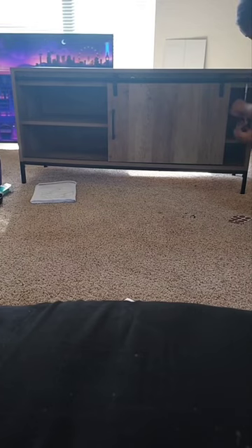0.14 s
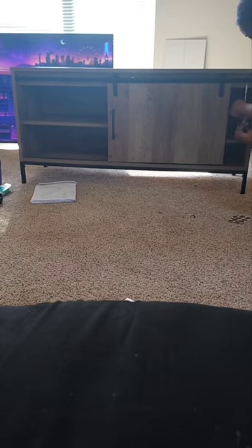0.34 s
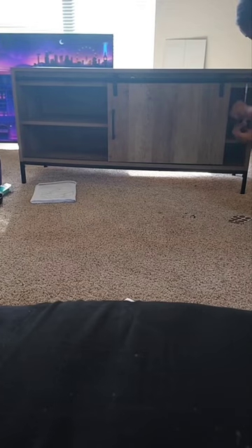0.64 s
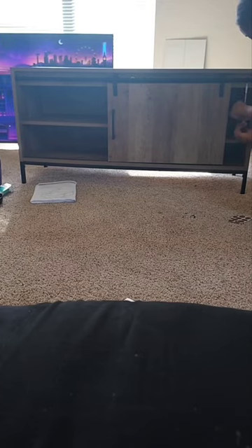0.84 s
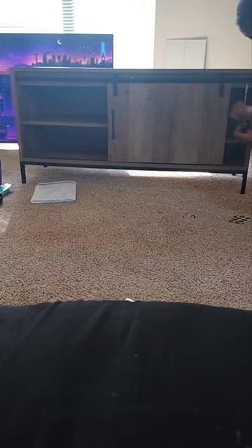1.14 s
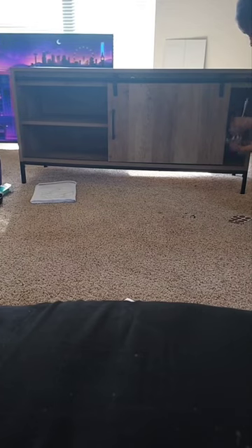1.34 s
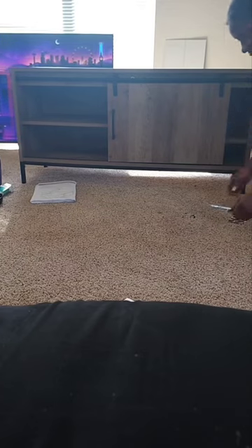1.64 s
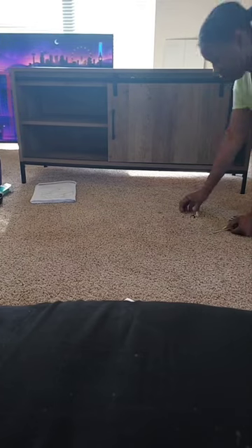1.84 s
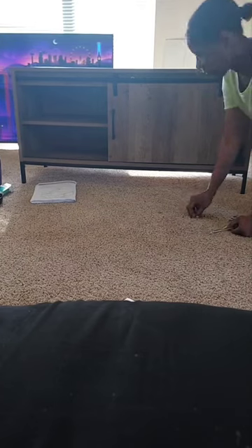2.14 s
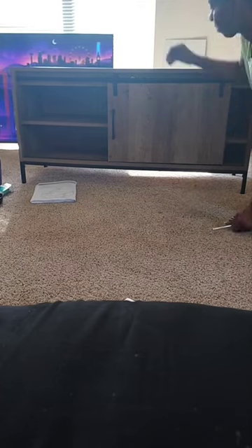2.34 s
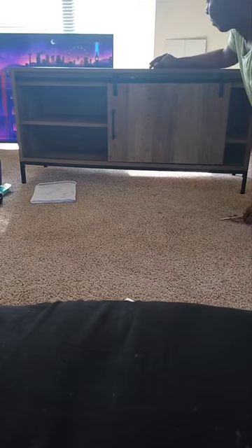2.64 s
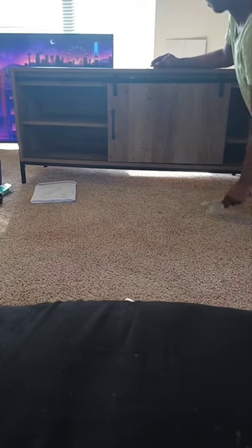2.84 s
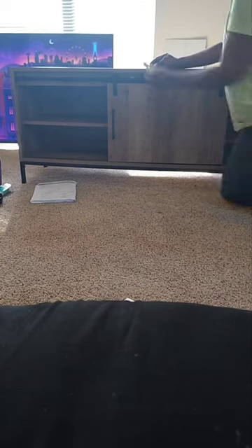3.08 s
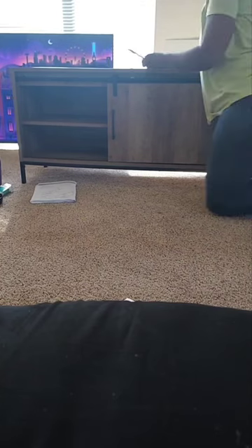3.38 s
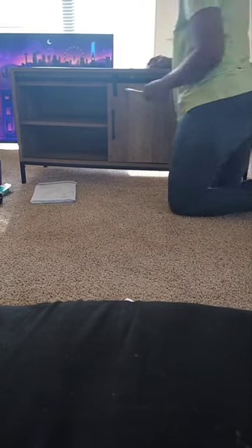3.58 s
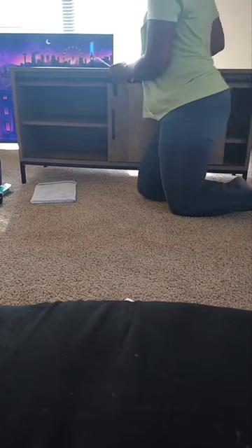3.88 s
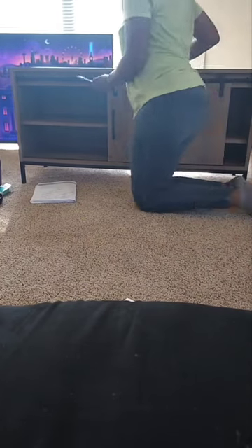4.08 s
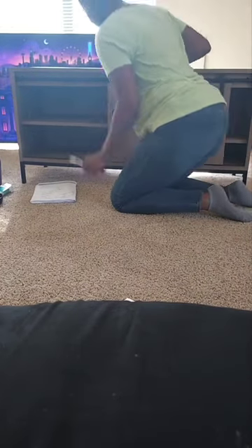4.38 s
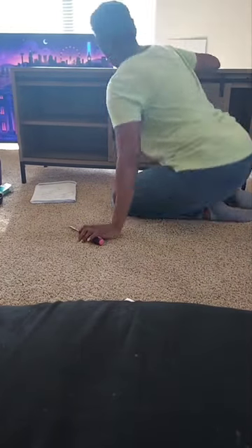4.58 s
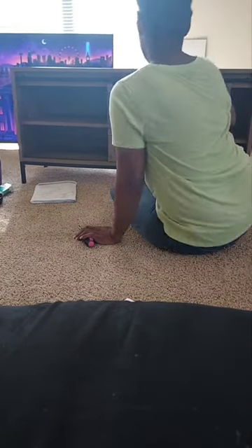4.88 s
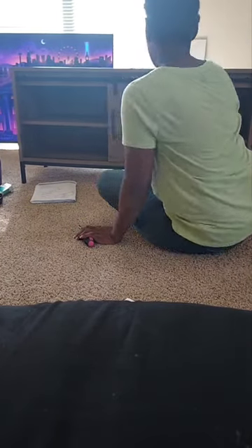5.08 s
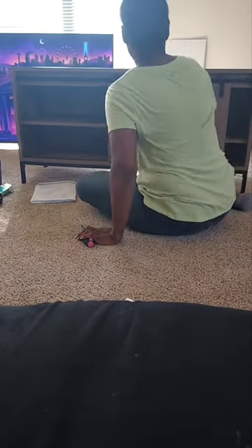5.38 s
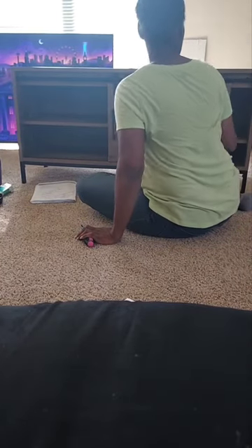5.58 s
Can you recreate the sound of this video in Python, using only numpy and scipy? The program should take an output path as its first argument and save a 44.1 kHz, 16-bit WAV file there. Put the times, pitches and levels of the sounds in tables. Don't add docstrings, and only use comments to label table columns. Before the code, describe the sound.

In a carpeted living room, a steady low hum with airy duct rumble dominates. Soft, dull knocks of tool and fittings come sparsely, with tiny metal ticks from 1.7 seconds. Near 2.8 seconds the cabinet is nudged and screws patter on its top. Slides and clothing rustle follow, then more shoves after 5 seconds. A stereo phone listens from a few steps away.

```python
import sys
import numpy as np
from scipy import signal
from scipy.fft import rfft, irfft, next_fast_len
from scipy.io import wavfile
from scipy.ndimage import uniform_filter1d, map_coordinates

SR = 44100
rng = np.random.default_rng(int(sys.argv[2]) if len(sys.argv) > 2 else 0)


def undo_db(level):
    steps = np.asarray(level, float) / 20
    return 10 ** steps


def wrap_up_sound(samples):
    columns = np.atleast_2d(samples).T
    tamed = np.clip(columns, -1, 1)
    steps = np.round(tamed * 32767).astype(np.int16)
    wavfile.write(sys.argv[1], SR, steps)


N = 252252

# [t/s, peak level/dB, sheen level/dB, upper ring level/dB]
KNOCKS = [(0.225, -57, -23, -0.5), (.287, -50, -14.5, 2), (.55, -64.5, -23.5, -5.5),
          (.697, -49.5, -22.5, -1), (1.025, -64.5, -18, 4.5), (1.162, -54, -17.5, -5),
          (1.248, -59.5, -17.5, 1), (1.344, -64, -12.5, -3), (1.664, -61.5, -24, -1), (1.712, -58, -6, -2),
          (1.762, -48, -12, -6), (2.297, -54.5, -16.5, -6.5), (2.509, -67, -11, -10),
          (3.345, -59, -21.5, -3.5), (3.495, -63.5, -13, -14.5), (3.882, -58, -24.5, 1),
          (3.99, -59, -16, -5.5), (4.462, -61, -14.5, 0)]
KNOCK_S, KNOCK_PANEL_DB = 0.03, 0

# [t/s, peak level/dB, sheen level/dB]
SCREWS = [
    (2.819, -42.5, -16.5),
    (2.837, -36.5, -17),
    (2.851, -45.5, -3),
    (2.864, -50, -9),
    (2.888, -51, -8),
    (2.911, -52, -9),
]
SCREW_S, SCREW_PANEL_DB, SCREW_UPPER_DB = 0.017, -11.5, -6.5

# [t/s, peak level/dB, contact length/s, sheen level/dB]
SHOVES = [
    (2.765, -51, 0.028, -14),
    (4.99, -48.5, 0.036, -17),
    (5.388, -47.5, 0.033, -15),
    (5.6, -57, 0.11, -18),
    (5.664, -48, .065, -36),
]
SHOVE_PANEL_DB, SHOVE_UPPER_DB = -2, -9

# [t/s, peak level/dB, contact length/s]
SLIDES = [
    (0.033, -57, 0.072),
    (1.775, -63, 0.032),
    (2.31, -62.5, .07),
    (2.926, -56, 0.086),
    (3.089, -55, 0.051),
    (3.589, -57.5, 0.062),
    (3.7, -62.5, 0.15),
    (4.306, -57.5, 0.15),
    (4.802, -63.5, 0.13),
]
SLIDE_PANEL_DB, SLIDE_SHEEN_DB, SLIDE_UPPER_DB = -9.5, -6.5, -4.5

# [t/s, peak level/dB, left-right difference/dB]
TICKS = [
    (1.726, -56, 13.5),
    (1.769, -53.5, -1.5),
    (2.4937, -58.5, 5),
    (2.8926, -51, 7),
    (3.0979, -57.5, 15),
    (3.1426, -58, 14.5),
    (3.6176, -66, 2),
    (4.905, -51, 12),
    (5.6692, -65, 2),
]

# [t/s, level/dB]
CLOTH = [
    (0, -72),
    (.4, -76),
    (1.4, -79.5),
    (2.7, -79.5),
    (3.0, -71.5),
    (4.15, -72),
    (4.8, -71.5),
    (5.0, -71),
    (5.72, -70.5),
]

# [f/Hz, level/dB]
PANEL = [(300, -26.5), (700, -2), (1200, 0), (1900, 2), (2500, -7), (4000, -34.5)]
LOW_RING = [(1200, -26.5), (2000, -13.5), (2500, 2.5), (3200, -0.5), (3800, -10), (6000, -30)]
HIGH_RING = [(2500, -29), (3900, -5), (4600, 2), (5300, 1), (6000, -10), (8000, -26)]
BOARD_RING = [(1200, -28), (2100, -19), (2600, -3.5), (3400, 1), (4200, -4.5), (4800, -14), (6500, -29.5)]
PILE = [(900, -49.5), (1900, -31.5), (2500, -10.5), (3500, -9.5), (5000, -13.5), (5600, -15.5),
        (6300, -19.5), (9000, -43.5)]
SHEEN = [(3000, -7.5), (6000, 0), (8000, 1.5), (10500, 0.5), (13000, -6), (15600, -16)]

# [f/Hz, T60/s]
ROOM = [(500, 0.43), (2000, 0.37), (5000, 0.19), (9000, 0.19), (14000, 0.24)]

# [t/s, level/dB]
HUM = [
    (0.0, -29),
    (1.3, -28),
    (2.3, -29),
    (2.6, -28),
    (3.7, -28.5),
    (4.1, -30),
    (4.5, -29),
    (5.72, -29.5),
]
MAINS_HZ = 59.99

# [t/s, left shift/ms, right shift/ms]
SKIPS = [
    (1.135, -2.63, -.34),
    (1.598, 2.9, 2.5),
    (3.798, -2.23, -2.3),
    (4.956, -3.82, -3.71),
    (5.152, 1.74, 1.8),
    (5.199, 3.18, 3.02),
]

# [f/Hz, level per Hz/dB]
RUMBLE = [(15, -76.5), (25, -14), (50, -7.5), (80, -1), (105, -4), (170, -10), (300, -15.5), (440, -16.5),
          (480, -28), (660, -28), (900, -64)]
VENT = [(380, -35), (640, -16), (782, -5.5), (858, 0.5), (1120, -1.5), (1210, -1), (1410, -8.5),
        (1760, -0.5), (2120, -11.5), (2360, -11), (2700, -17.5), (3920, -20.5), (4420, -17.5),
        (6250, -29.5), (15500, -49)]

# [f/Hz, width/Hz, level/dB]
DUCT = [(221.9, 22, -2), (245.2, 28.4, 0.5), (277, 30, -12)]
BRANCH = [(369.5, 25, -10.5), (537, 34, -14), (601.4, 20, -25.5), (742, 56, -31), (868, 71, -32.5)]
WHINES = [(1035.6, 38, -69), (1211.6, 22, -70.5), (11800, 350, -94.5)]

# [t/s, level change/dB]
SURGES = [(.19, 2.5), (.63, 2), (1.08, 2.5), (1.9, 3), (4.25, 2), (0.959, 3), (1.33, -0.5), (1.45, 6),
          (2.36, 4.5), (2.61, 7), (2.8, -2.5), (3.149, 4), (3.3, -4), (3.65, 5), (4.08, -6.5), (4.5, -3),
          (4.76, -1), (4.938, 5), (5.06, 2), (5.299, -7.5), (5.55, 8.5)]
DUCT_DB, SURGE_S, FLUTTER_DB = -36.5, 0.036, 2.5

# [f/Hz, likeness 0..1]
ALIKE = [(20, .2), (45, .55), (80, .9), (140, .85), (175, .3), (200, .02)]

# [f/Hz, left-right level/dB]
SIDES = [(20, -11), (36, -6), (125, -4.5), (220, -1.5), (260, -5), (440, -5), (700, -1), (1300, 2),
         (2500, 4), (4500, 1), (8000, 2.5), (15000, -.5)]
TOP_HZ = 15720


def unit(x):
    return x / np.sqrt(np.mean(x ** 2) + 1e-20)


def along(points, hz):
    f, v = np.transpose(points)
    return np.interp(np.log(hz + 1), np.log(f + 1), v)


def curve(points):
    s, v = np.transpose(points)
    return np.interp(np.arange(N) / SR, s, v)


def wobble(rate):
    knots = rng.standard_normal(int(N * rate / SR) + 4)
    return map_coordinates(knots, [np.arange(N) * rate / SR])


def filtered(x, response):
    length = x.shape[-1]
    m = next_fast_len(length + 8192)
    return irfft(rfft(x, m) * response(np.fft.rfftfreq(m, 1 / SR)), m)[..., :length]


def rush(gain, patchy_db):
    z = signal.stft(rng.standard_normal((2, N)), nperseg=512)[2]
    field = uniform_filter1d(rng.standard_normal(z.shape[1:]), size=6, axis=0)
    field = uniform_filter1d(field, size=14, axis=1)
    pair = signal.istft(z * undo_db(patchy_db * unit(field)), nperseg=512)[1][:, :N]

    def mid_side_gain(hz):
        turn = np.arccos(np.clip(along(ALIKE, hz), 0, 1)) / 2
        return gain(hz) * np.array([np.cos(turn), np.sin(turn)])

    mid, side = filtered(pair, mid_side_gain)
    return unit(np.array([mid + side, mid - side]))


def knocks():
    rows = [(s, db, KNOCK_PANEL_DB, sheen_db, upper_db, KNOCK_S) for s, db, sheen_db, upper_db in KNOCKS]
    return contacts(rows, LOW_RING, gain_db=6.5, direct_db=-4.5, grain_db=1, dull_hz=14000)


def board():
    rows = [(s, db, SCREW_PANEL_DB, sheen_db, SCREW_UPPER_DB, SCREW_S) for s, db, sheen_db in SCREWS]
    rows += [(s, db, SHOVE_PANEL_DB, sheen_db, SHOVE_UPPER_DB, length) for s, db, length, sheen_db in SHOVES]
    return contacts(rows, BOARD_RING, gain_db=7, direct_db=-6, grain_db=3.5, dull_hz=13000)


def slides():
    rows = [(s, db, SLIDE_PANEL_DB, SLIDE_SHEEN_DB, SLIDE_UPPER_DB, length) for s, db, length in SLIDES]
    return contacts(rows, LOW_RING, gain_db=-1.5, direct_db=-0.5, grain_db=1.0, dull_hz=18000)


def contacts(rows, ring, gain_db, direct_db, grain_db, dull_hz):
    out, length = np.zeros((2, N + SR)), SR // 3
    t = np.arange(length) / SR
    for s, db, panel_db, sheen_db, upper_db, contact_s in rows:
        lumps = unit(uniform_filter1d(rng.standard_normal(length), size=70))
        press = np.sin(np.pi * np.minimum(t / contact_s, 1)) ** 2
        chatter = rng.standard_normal((2, length)) * undo_db(grain_db * lumps) * press
        parts = [(ring, 0), (HIGH_RING, upper_db), (PANEL, panel_db), (SHEEN, sheen_db - 4.0)]

        def colour(hz):
            body = sum(undo_db(along(part, hz) + part_db) for part, part_db in parts)
            return body / (1 + (hz / dull_hz) ** 4)

        echo = signal.fftconvolve(chatter, room(length), axes=1)[:, :length]
        heard = filtered(undo_db(direct_db) * chatter + echo, colour)
        grain_rms = np.sqrt(np.mean(chatter ** 2) / np.mean(press ** 2))
        out[:, round(s * SR):][:, :length] += undo_db(db + gain_db) * heard / grain_rms
    return out[:, :N]


def room(length):
    hz, t, z = signal.stft(rng.standard_normal((2, length)), SR, nperseg=256)
    decay = undo_db(-60 * t / along(ROOM, hz)[:, None])
    tail = signal.istft(z * decay, SR, nperseg=256)[1][:, :length]
    tail = tail * (1 - np.exp(-np.arange(length) / SR / 0.008))
    return tail / np.linalg.norm(tail, axis=1, keepdims=True)


def ticks():
    out, t = np.zeros((2, N + SR)), np.arange(SR // 8) / SR
    decay = undo_db(-60 * t / 0.015) + undo_db(-10 - 60 * t / 0.1)
    for s, db, pan_db in TICKS:
        click = rng.standard_normal((2, len(t))) * decay
        sides_db = np.array([[0.5], [-0.5]]) * pan_db
        out[:, round(s * SR):][:, :len(t)] += undo_db(db - 4 + sides_db) * click
    return filtered(out[:, :N], lambda hz: undo_db(along(SHEEN, hz)) * np.minimum(hz / 11000, 1) ** 1.5)


def cloth():
    drag_db = curve(CLOTH)
    sheen_db = 3.1 * (drag_db - drag_db.max()) - 63
    lumps_db = 0.8 * wobble(18)
    pile = rush(lambda hz: undo_db(along(PILE, hz)), patchy_db=1)
    weave = rush(lambda hz: undo_db(along(SHEEN, hz)), patchy_db=0.5)
    return undo_db(drag_db - 1.0 + lumps_db) * pile + undo_db(sheen_db - 15 + lumps_db / 2) * weave


def ventilation():
    hum = undo_db(curve(HUM) + 1.0) * motor()
    rumble = undo_db(-38.0) * rush(lambda hz: undo_db(along(RUMBLE, hz)), patchy_db=1)
    duct = undo_db(surges()) * rush(pipe(DUCT), patchy_db=-1.43)
    branch = undo_db(-46.0 + 1.2 * wobble(7.1)) * rush(pipe(BRANCH), patchy_db=2.96)
    hiss = undo_db(-59.5 + 0.13 * wobble(8)) * rush(lambda hz: undo_db(along(VENT, hz)), patchy_db=1.34)
    air = rumble + duct + branch + hiss
    for centre_hz, width_hz, db in WHINES:
        air = air + undo_db(db) * rush(lambda hz: peak(hz, centre_hz, width_hz) ** 2, patchy_db=-1.5)
    return hum + air


def motor():
    t, hum_hz = np.arange(N) / SR, 2 * MAINS_HZ
    lead_ms = np.array([[-1.26], [-2.31]])
    for s, left_ms, right_ms in SKIPS:
        lead_ms = lead_ms + (t > s) * np.array([[left_ms], [right_ms]])
    turn = np.exp(2j * np.pi * hum_hz * lead_ms / 1000)
    fade = uniform_filter1d(turn.real, size=500) + 1j * uniform_filter1d(turn.imag, size=500)
    tone = np.real(fade * np.exp(2j * np.pi * hum_hz * t))
    return np.sqrt(2) * undo_db(0.82 * wobble(5.2)) * tone


def surges():
    t = np.arange(N) / SR
    swells_db = sum(db * np.exp(-((t - s) / SURGE_S) ** 2) for s, db in SURGES)
    return DUCT_DB + FLUTTER_DB * wobble(9) + swells_db


def pipe(resonances):
    return lambda hz: sum(undo_db(db) * peak(hz, c, 1.07 * w) ** 2 for c, w, db in resonances)


def peak(hz, centre_hz, width_hz):
    return hz * width_hz / np.sqrt((centre_hz ** 2 - hz ** 2) ** 2 + (hz * width_hz) ** 2)


def scene():
    return knocks() + board() + slides() + ticks() + cloth() + ventilation()


def top_cut(x):
    return signal.sosfilt(signal.butter(12, 15630, fs=SR, output="sos"), x)


def record(dry):
    halves = np.array([[0.5], [-0.5]])
    mix = filtered(dry, lambda hz: undo_db(halves * along(SIDES, hz)) * (hz < TOP_HZ))
    return top_cut(mix)


dry = scene()
out = record(dry)
wrap_up_sound(out)
```